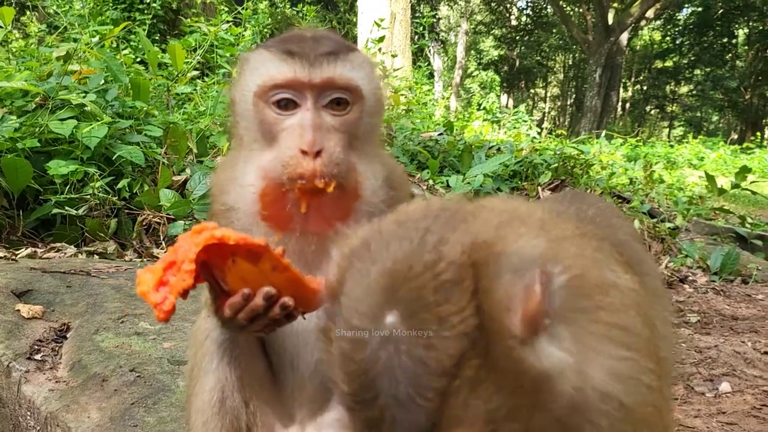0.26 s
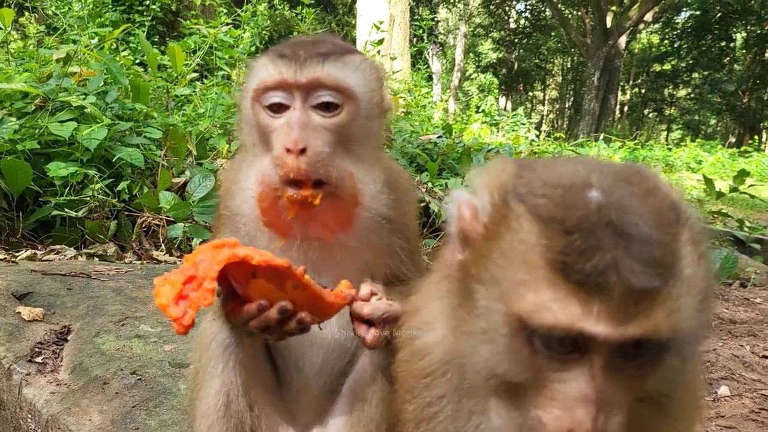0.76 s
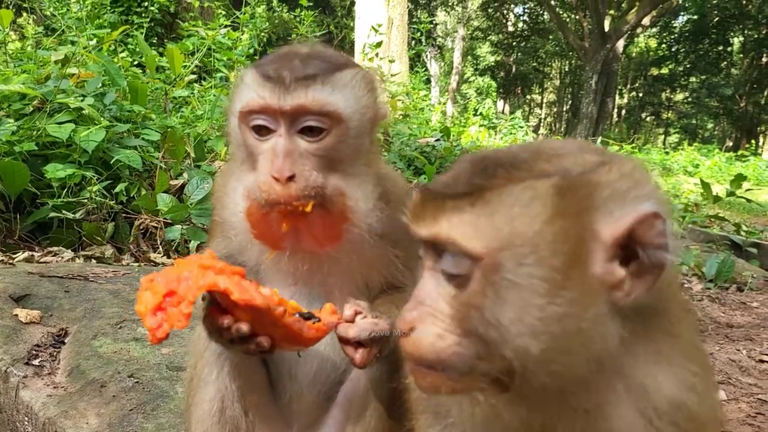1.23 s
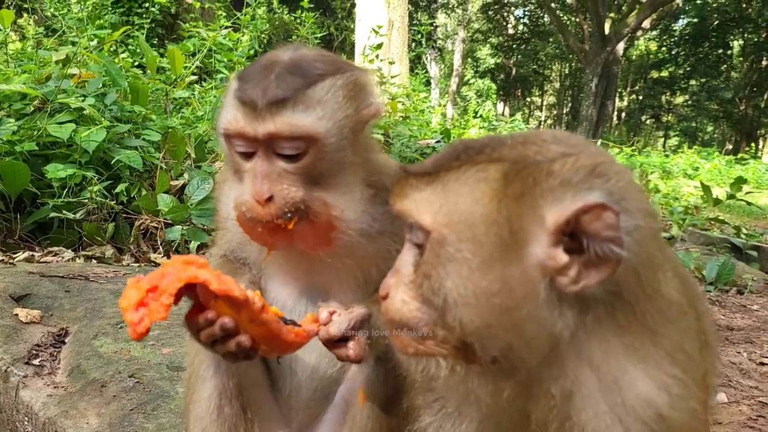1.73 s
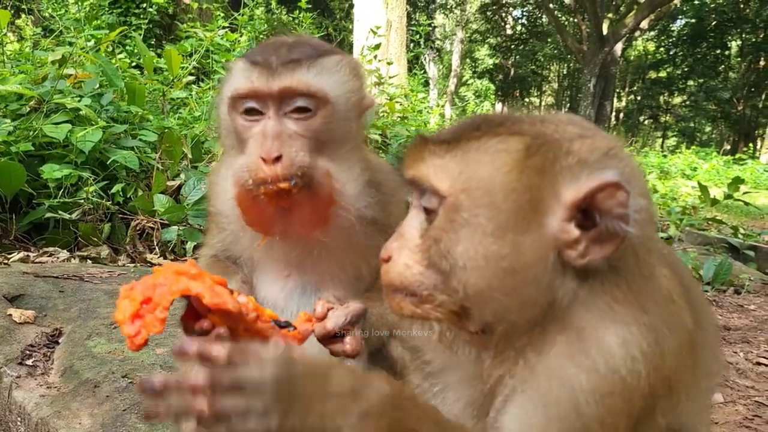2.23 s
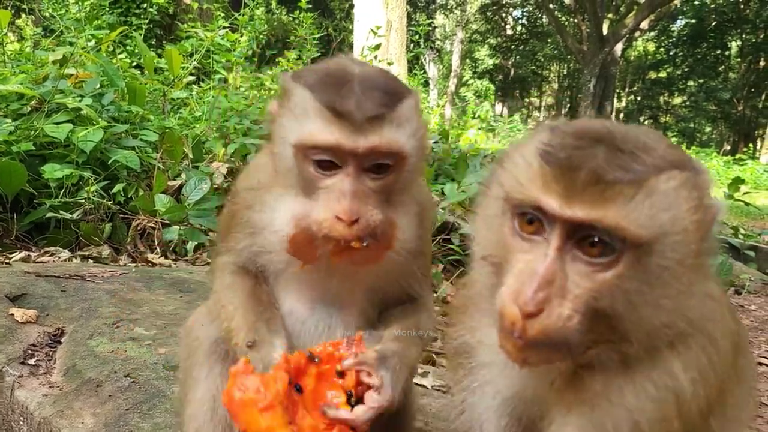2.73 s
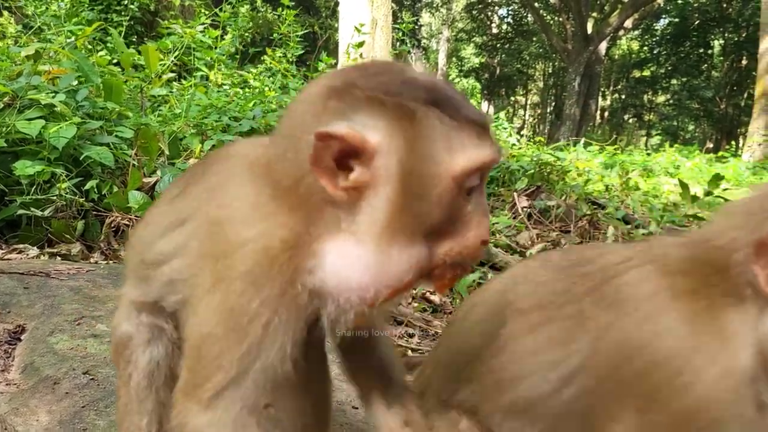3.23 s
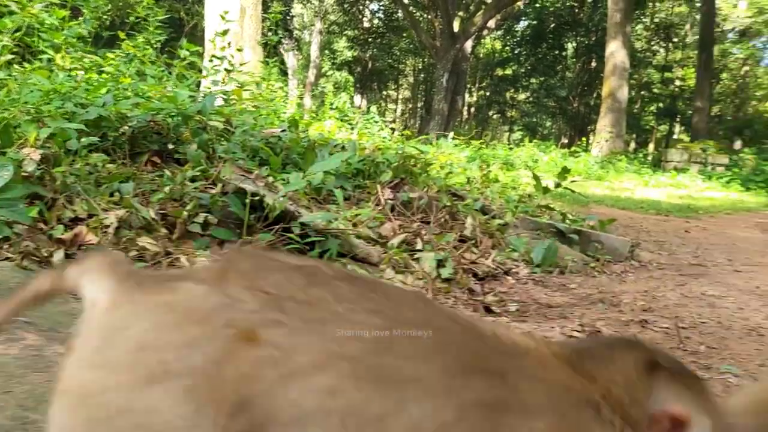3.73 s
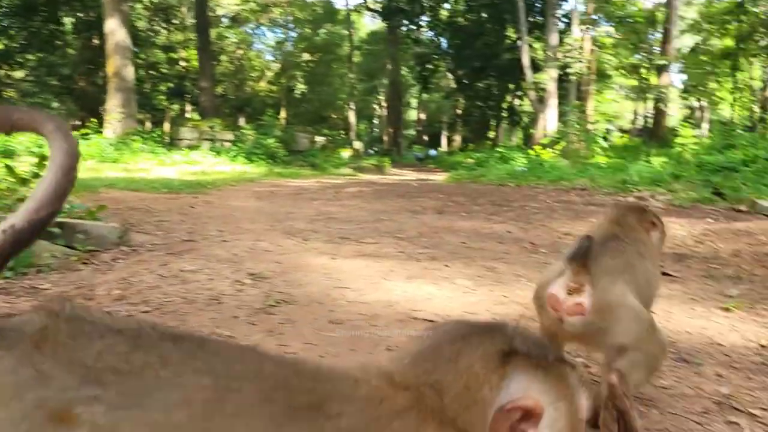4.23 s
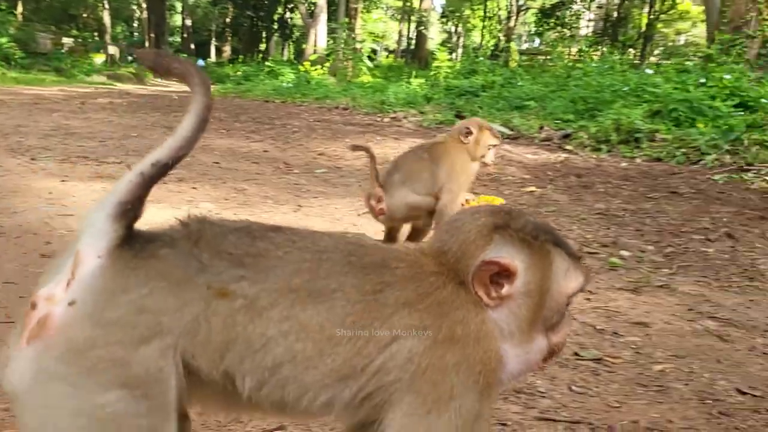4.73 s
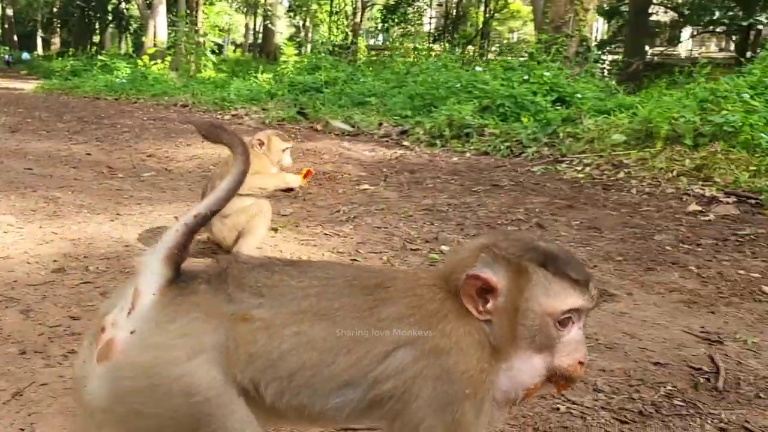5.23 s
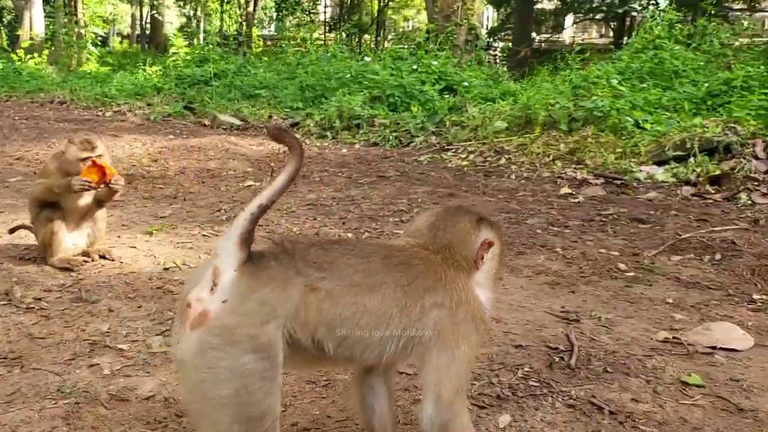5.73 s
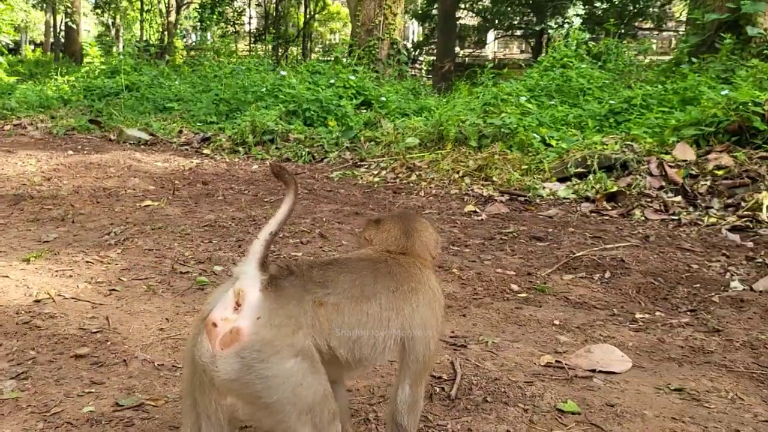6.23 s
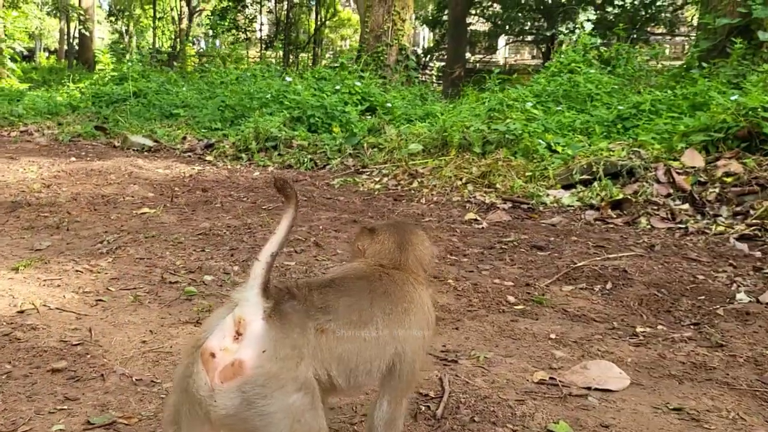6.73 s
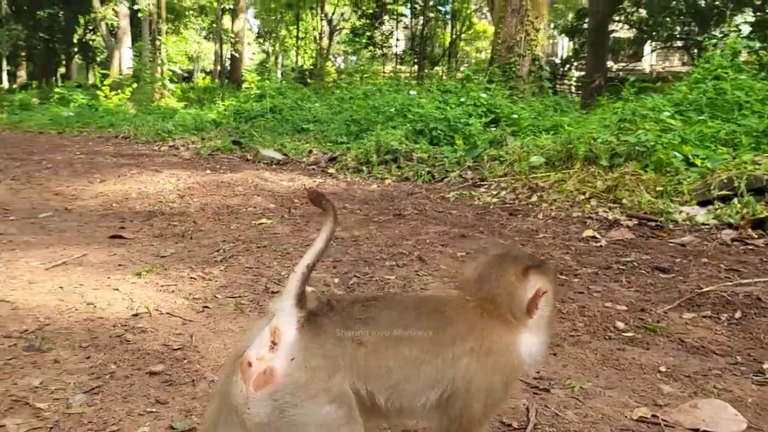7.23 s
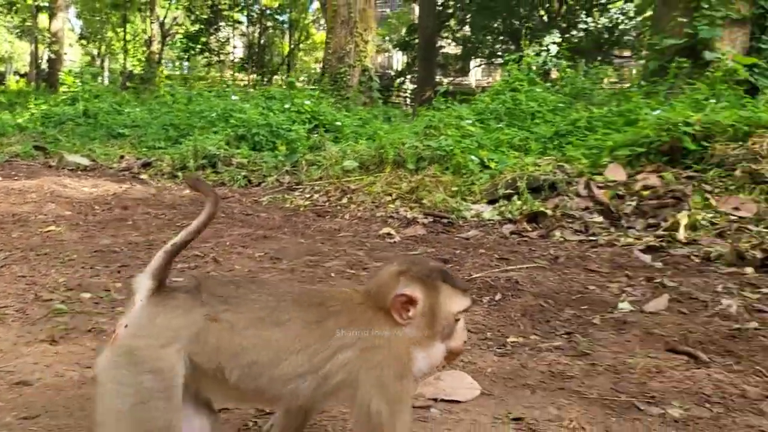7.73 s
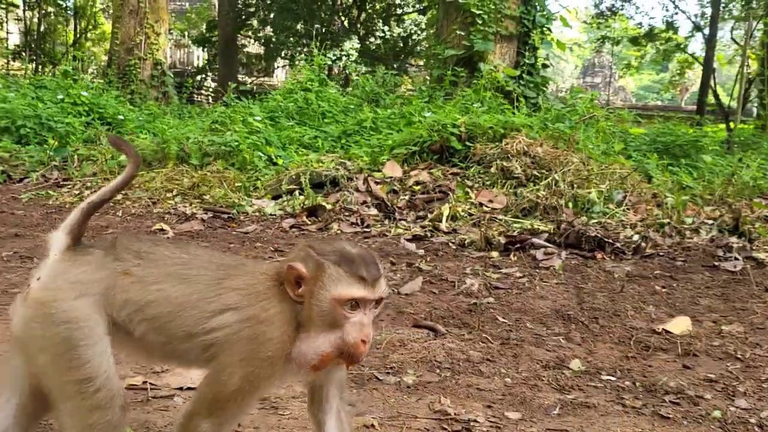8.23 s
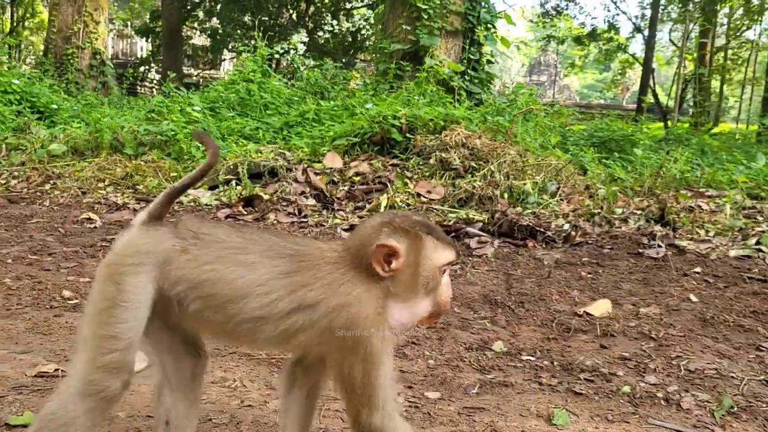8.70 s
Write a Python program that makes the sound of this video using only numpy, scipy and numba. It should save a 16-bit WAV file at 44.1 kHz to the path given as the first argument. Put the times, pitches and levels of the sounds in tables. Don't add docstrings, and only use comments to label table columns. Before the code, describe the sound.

Cicadas whine steadily in a forest clearing over low engine throb, while nearby monkeys snap twigs, squeak sharply once and step on soil.

```python
import sys
import numpy as np
from scipy import signal
from scipy.io import wavfile
from scipy.ndimage import uniform_filter1d
from numba import njit

SR = 44100
rng = np.random.default_rng(int(sys.argv[2]) if len(sys.argv) > 2 else 0)


def unload_audio(sound):
    columns = np.transpose(np.atleast_2d(sound))
    steps = np.round(np.clip(columns, -1, 1) * 32767)
    wavfile.write(sys.argv[1], SR, steps.astype(np.int16))


def gain_from_decibels(decibels):
    exponent = np.asarray(decibels, float) / 20
    return 10 ** exponent


N = 395136
TIME = np.arange(N) / SR


def level(x, db):
    return x * gain_from_decibels(db) / np.sqrt(np.mean(x ** 2))


def curves(table):
    s, *columns = np.transpose(table)
    return [np.interp(TIME, s, c) for c in columns]


def blend(*dbs):
    return 10 * np.log10(sum(gain_from_decibels(2 * db) for db in dbs))


@njit
def svf(x, hz, width):
    y, b, l = np.empty(len(x)), 0., 0.
    for i in range(len(x)):
        g, k = np.tan(np.pi * hz[i] / SR), width / hz[i]
        v = (b + g * (x[i] - l)) / (1 + g * (g + k))
        b, l, y[i] = 2 * v - b, l + 2 * g * v, k * v
    return y


def ring(x, hz, width, order=2):
    lo = np.sqrt(hz ** 2 + width ** 2 / 4) - width / 2
    edges = [lo, min(lo + width, .45 * SR)]
    return signal.sosfilt(signal.butter(order, edges, "band", fs=SR, output="sos"), x)


def walk(rate):
    hold = max(int(SR / 64 / rate), 1)
    held = np.repeat(rng.standard_normal(N // 64 // hold + 2), hold)
    coarse = uniform_filter1d(uniform_filter1d(held, hold), hold)
    return 1.3 * np.interp(np.arange(N) / 64, np.arange(len(coarse)), coarse)


def pair(likeness):
    mid, side = rng.standard_normal((2, N))
    c = np.clip(likeness, -1, 1)
    return np.sqrt(1 + c) * mid + np.sqrt(1 - c) * side * np.array([[1], [-1]])


def clicks(hz, jitter, scatter_db):
    timing, size = rng.standard_normal((int(N * hz / SR), 2)).T
    at = np.cumsum(1 + jitter * timing) * SR / hz
    return np.bincount(np.clip(at, 0, N - 1).astype(int), gain_from_decibels(scatter_db * size), N)


def glide(length, from_hz, to_hz, width):
    n = int(length * SR)
    path = np.linspace(from_hz, to_hz, n + 400)
    tone = svf(rng.standard_normal(n + 400), path, 1. * width)[400:]
    return level(tone, 0) * np.hanning(n) ** 0.37


def sides(pan_db):
    return gain_from_decibels(np.array([[.5], [-.5]]) * pan_db)


def add(out, s, burst, pan_db=0.):
    lag = int(np.clip(pan_db * 3, -18, 18))
    for side, sign in enumerate((1, -1)):
        i = int(s * SR) - sign * lag // 2
        out[side, i:i + len(burst)] += burst * 2 / (1 + gain_from_decibels(-sign * pan_db))


def trees(x, wet_db):
    t60_s = 0.091
    t = TIME[:int(.6 * SR)]
    tail = rng.standard_normal((2, len(t))) * np.exp(-np.log(1000) * t / t60_s) * (t > .01)
    return gain_from_decibels(wet_db) * signal.fftconvolve(x, tail / np.sqrt(np.sum(tail[0] ** 2)), axes=1)[:, :N]


# start_s, level_db
CHORUS = [(0.0, -48.5), (1.27, -50), (2.2, -49.5), (3.0, -50), (3.8, -49), (4.5, -50), (5.5, -49.5),
          (6.2, -48.5), (7.901, -49.5), (8.43, -46.5), (8.96, -48)]
# start_s, left_minus_right_db
CHORUS_PAN = [(0, 3.5), (2.6, 2), (4.2, 5), (4.6, 0), (5.7, -1), (7.8, -1), (8.96, -3.5)]


def cicadas():
    out = np.zeros((2, N))
    upper_db = curves(CHORUS)[0]
    lower_db = blend(-78, curves(HISS)[0] - 9, phrase() - 13)
    for db, lo_hz, hi_hz, count in ((upper_db, 7130, 7510, 6), (lower_db, 6710, 6800, 2)):
        choir = np.zeros((2, N))
        for hz in np.linspace(lo_hz, hi_hz, count):
            taper_db = -5 * ((2 * hz - lo_hz - hi_hz) / (hi_hz - lo_hz) + 0.34) ** 2
            buckles = np.array([clicks(rng.uniform(150, 300), .3, 4.54) for _ in out])
            singing = level(ring(buckles, hz, 109.5, order=3), 0)
            choir = choir + singing * gain_from_decibels(taper_db + 1.9 * walk(9))
        stragglers = ring(pair(0.), (lo_hz + hi_hz) / 2 - 50, 2.2 * (hi_hz - lo_hz), order=3)
        out = out + (level(choir, 1.34) + level(stragglers, -25)) * gain_from_decibels(db)
    flicker_db = 1.57 * np.array([walk(25), walk(25)])
    return out * gain_from_decibels(flicker_db) * sides(curves(CHORUS_PAN)[0])


# start_s, length_s, level_db
PHRASES = [
    (6.45, .95, -61),
    (7.87, .98, -63),
]


def phrase():
    rise_s, fall_s, sag_db = .15, .15, -5
    gain = 1e-4
    for s, length, db in PHRASES:
        edge = np.minimum((TIME - s) / rise_s, (s + length - TIME) / fall_s)
        tired_db = sag_db * np.clip((TIME - s) / length, 0, 1)
        gain = gain + np.clip(edge, 0, 1) ** 2 * gain_from_decibels(db + 80 + tired_db)
    return 20 * np.log10(gain) - 80


def singer():
    buckles = np.array([clicks(400, .3, 3.7) for _ in range(2)])
    low = level(ring(buckles, 4560, 160), -1.8) * gain_from_decibels(2.2 * walk(18))
    high = level(ring(buckles, 6100, 300), -11)
    overtone = level(ring(buckles + .3 * pair(0.), 9120, 1540, order=5), -9.0)
    return (low + high + overtone) * gain_from_decibels(phrase() + 1.2 * walk(12))


# start_s, length_s, level_db, first_pitch_hz, breath_db
SLURS = [
    (0.335, 0.086, -79, 4250, 9.5),
    (1.068, 0.07, -78, 4400, 7),
    (1.85, 0.13, -67, 4400, 2),
    (2.74, 0.092, -72, 4400, 6),
    (4.215, 0.15, -74, 3810, 4),
    (4.955, 0.125, -75, 4200, 1),
    (6.19, 0.1, -79, 4570, -8),
    (7.363, 0.1, -78, 4450, -4),
    (7.887, .07, -79, 4850, -2),
]


def bird():
    rise_hz_per_s, flutter_db, echo_db = 11500, 3, -4
    out = np.zeros((2, N))
    for s, length, db, from_hz, breath_db in SLURS:
        t = TIME[:int(length * SR)]
        whistle = np.sin(2 * np.pi * (from_hz + rise_hz_per_s * t / 2) * t)
        pure = np.sqrt(2) * whistle * np.hanning(len(t)) ** .4
        breath = glide(length, from_hz, from_hz + rise_hz_per_s * length, 380)
        add(out, s, gain_from_decibels(db) * (pure + gain_from_decibels(breath_db) * ring(breath, 4900, 2400)), 3.)
    out = out * gain_from_decibels(flutter_db * walk(45))
    return out + trees(out, echo_db)


# start_s, peak_db, ring_pitch_hz, crackle_db, left_minus_right_db
SNAPS = [(0.7453, -25, 2780, -52, 1), (1.9624, -29, 5040, -32, 4), (2.9937, -32.5, 2450, -7, 1.5),
         (3.057, -29, 2900, -7, 13), (3.068, -39, 2900, 9, -1.5), (3.0752, -29.5, 2820, -1, 13),
         (3.118, -46, 2900, 6, 2), (3.2136, -12, 1455, -2, 31), (4.464, -33, 2860, -44, -14),
         (4.607, -27.5, 2970, -65, 1), (5.2505, -42, 3020, -60.5, 0), (5.2971, -27.5, 3140, -59, 4.5),
         (5.3059, -26, 3060, -60, -1), (6.9147, -26.5, 2560, -60, -1.5)]


def snaps(out):
    t60_s, splinters = 0.004, .2
    width, broad = .2, .2 * .8
    t = TIME[:4000]
    for s, db, hz, crackle_db, pan_db in SNAPS:
        fade = np.minimum(t / 0.00057, 1) * np.exp(-np.log(1000) * t / t60_s)
        noise = rng.standard_normal((2, len(t))) * fade
        snap = (t == 0) + splinters * noise[0]
        wood = ring(snap, hz, hz * width) + broad * ring(snap, 3040, 2400, order=4)
        leaf = ring(noise[1], 7160, 9000, order=3)
        burst = wood / wood.max() + gain_from_decibels(crackle_db) * leaf / leaf.max()
        add(out, s - .0002, gain_from_decibels(db - 6.0) * burst, pan_db)


# start_s, length_s, centre_pitch_hz,
# level_db, left_minus_right_db
RUSTLES = [(0.68, 0.04, 2400, -63, 4), (2.276, 0.04, 8400, -63, -0.5), (2.987, 0.017, 12400, -56, 13),
           (3.041, 0.088, 12000, -58, -3), (3.04, .07, 13000, -54, 0), (3.2136, 0.0021, 5600, -25.5, 29.5),
           (3.2134, 0.0026, 3130, -31, 27), (3.14, 0.077, 11500, -66, 8), (3.42, .2, 11300, -81, 3.5),
           (.75, .05, 4500, -61, 4), (.745, 0.053, 2280, -60, 2), (3.753, 0.045, 1400, -42.5, 2.5),
           (6.72, 0.1, 11000, -76, 0.5), (3.758, 0.11, 14200, -50.5, -1.5), (3.764, 0.097, 9300, -57.5, 6),
           (5.63, 0.014, 1370, -56, -7), (5.238, 0.095, 2740, -59, 1.5), (5.259, 0.07, 3570, -50.5, -2),
           (4.605, 0.0095, 1340, -58, -16), (6.721, .17, 2540, -54.5, 17), (0.759, 0.014, 11500, -65, 20),
           (3.2125, 0.006, 11050, -40, 20), (3.736, 0.011, 14000, -39.5, -3.5), (7.43, 0.21, 233, -62.5, 9)]


def rustles(out):
    for s, length, hz, db, pan_db in RUSTLES:
        n = int(length * SR)
        grains = rng.standard_normal(n) * gain_from_decibels(2.6 * rng.exponential(size=n))
        add(out, s, level(ring(grains, hz, 0.37 * hz, order=4), db) * np.hanning(n) ** .5, pan_db)


# start_s, peak_db, thud_pitch_hz, scuff_db, left_minus_right_db
STEPS = [
    (3.21, -35, 542, -20, 25),
    (3.962, -46, 154, -3.5, -2.5),
    (4.141, -50, 172, -26.5, 2),
    (5.389, -39.5, 151.3, -30.5, 2.5),
    (5.621, -25, 194, -5.5, -4),
    (5.63, -30.5, 178, -12.5, -2),
    (6.913, -47.5, 205, 8.5, -3),
]


def steps(out):
    t = TIME[:4000]
    for s, db, hz, scuff_db, pan_db in STEPS:
        thud = -np.cos(2 * np.pi * hz * t) * (t / 0.0014) ** 2 * np.exp(-t / 0.0014)
        scuff = ring(rng.standard_normal(len(t)) * t * np.exp(-t / 0.001), 1330, 295, order=4)
        add(out, s + 0.0014, gain_from_decibels(db) * (2.3 * thud + gain_from_decibels(scuff_db) * scuff / scuff.max()), pan_db)


# start_s, length_s, throat_pitch_hz, width_hz, level_db
SQUEAK = [
    (3.7375, 0.0125, 3900, 260, -22),
    (3.737, 0.011, 6040, 400, -19),
    (3.763, .024, 7270, 497, -26),
    (3.761, 0.022, 5500, 3040, -35.5),
    (3.77, 0.016, 6450, 300, -25.5),
    (3.782, 0.019, 5030, 40, -22.5),
    (3.793, 0.047, 2860, 943, -45.5),
]


def squeak(out):
    for s, length, hz, width, db in SQUEAK:
        sag = 250 * np.exp(-width / 300)
        add(out, s, gain_from_decibels(db) * ring(glide(length, hz + sag, hz - sag, width), 4760, 7100), -4.)


def monkeys():
    out = np.zeros((2, N))
    snaps(out)
    rustles(out)
    steps(out)
    squeak(out)
    return out + trees(out, -19.0)


# start_s, length_s, centre_pitch_hz, level_db, left_minus_right_db
CHIRPS = [(.36, .16, 4840, -63, 11), (1.935, .055, 5600, -60, 6), (1.945, .04, 5100, -62, 6),
          (2.14, .04, 3300, -57, 6), (3.34, .12, 12500, -72, 2), (3.36, .05, 11450, -72, 2),
          (3.47, .16, 11500, -74, 3), (3.98, .05, 14350, -76, 5), (3.36, .06, 14400, -76, 6),
          (3.36, .06, 15400, -78, 6), (3.527, .12, 14600, -72, 8), (3.56, .06, 15200, -74, 8),
          (3.53, .05, 13300, -73, 6), (6.773, .07, 3800, -62, 6), (6.92, .035, 3650, -64, 6),
          (7.08, .065, 4330, -60, 3), (7.615, .035, 4350, -72, 1), (5.288, .025, 4060, -56, -0.5),
          (5.291, .025, 2240, -59, 1)]


def chirps():
    out = np.zeros((2, N))
    for s, length, hz, db, pan_db in CHIRPS:
        n = int(length * SR)
        burst = ring(rng.standard_normal(8000), hz, 350, order=3)[-n:]
        add(out, s, level(burst, db) * np.hanning(n) ** .5, pan_db)
    return out


# start_s, shaft_pitch_hz, level_db
REVS = [(0.0, 74.5, -64.5), (1.07, 75.3, -47), (1.62, 73, -76), (1.85, 70.5, -40), (2.27, 94.0, -52),
        (3.57, 96.0, -65), (4.02, 76.5, -59), (4.59, 73, -72), (4.69, 68.0, -61.5), (5.49, 61.78, -55.5),
        (5.89, 84.7, -48), (6.81, 93.5, -53.5), (7.31, 88.4, -50), (8.11, 96.6, -59.5),
        (8.36, 87.96, -46.5), (8.73, 94.8, -60), (8.96, 82.7, -56.5)]
# start_s, level_db
LOAD = [(0.0, -81), (0.67, -85.5), (1.57, -70.5), (2.0, -68), (2.22, -57.5), (2.54, -54), (3.04, -51.5),
        (3.42, -57.5), (3.72, -53.5), (4.12, -66.5), (4.72, -91.5), (5.66, -79.5), (6.26, -64),
        (6.74, -56.5), (7.4, -60), (7.65, -65), (7.95, -59), (8.17, -57.5), (8.24, -65), (8.96, -64)]
# start_s, level_db
HISS = [(0, -69), (.67, -67), (1.57, -66.5), (2.0, -64.5), (2.54, -67), (3.04, -59), (3.42, -62),
        (3.8, -56), (4.12, -67), (4.72, -84.5), (5.16, -76), (5.4, -90), (6.26, -99), (6.74, -63.5),
        (6.95, -61), (7.15, -66), (7.3, -73), (7.5, -86.5), (8.3, -70), (8.96, -75.5)]
# start_s, left_minus_right_db
HISS_PAN = [(0, 12.5), (2.6, 8), (4.1, 7.5), (4.5, 4), (5.7, 6.5), (7.6, 6.5), (8.1, 0), (8.96, 0)]
# pitch_hz, width_hz, level_db
WORK_BANDS = [
    [(1281, 262, 3), (609, 120, -14), (840, 590, -8.5), (338, 110, -25)],
    [(2030, 550, -1), (2880, 650, 1.5)],
    [(3475, 370, -2), (3846, 406, 3.5), (4330, 590, 2), (4714, 290, 1.5), (5500, 680, -9),
     (6330, 430, -5.5)],
    [(8970, 550, 2), (9920, 3100, -6), (10600, 1100, -8)],
]


def working():
    hz, db = curves(REVS)
    shaft = np.sin(2 * np.pi * np.cumsum(hz * (1 + .01 * walk(10))) / SR)
    out = gain_from_decibels(db + 2 + 1.5 * walk(8)) * shaft
    gust = walk(3.766)
    load, hiss, turn = curves(LOAD)[0], curves(HISS)[0], curves(HISS_PAN)[0]
    levels = load, blend(load - 12, hiss - 4), hiss, hiss - 14.5
    pans = -5, .4 * turn, turn, .3 * turn
    for db, band, pan_db, patchy_db in zip(levels, WORK_BANDS, pans, (1.8, 1.3, 1.8, 1.3)):
        noise, air = pair(.5), 0
        for f, width, part_db in band:
            air = air + level(ring(noise, f, width, order=3), 0) * gain_from_decibels(part_db + patchy_db * walk(12))
        out = out + level(air, 3.6) * gain_from_decibels(db + 0.5 * gust + 1.25 * walk(30)) * sides(pan_db)
    return out


# start_s (middle), thud_db, half_length_s, drone_minus_thud_db
GUSTS = [(0.273, -42.5, 0.045, -17), (0.719, -43.5, 0.026, -1.5), (0.94, -40, 0.17, -5),
         (1.336, -35.5, .06, -2.5), (1.501, -40, 0.035, -8), (1.801, -45, 0.065, -3),
         (2.006, -39.5, 0.1, -0.5), (2.367, -39.5, 0.12, -0.5), (2.606, -34.5, 0.075, -4),
         (2.914, -40.5, 0.13, 3), (3.116, -44, 0.054, 6.5), (3.346, -41.5, 0.019, -2),
         (3.483, -51.5, 0.036, 3), (3.585, -41.5, 0.076, 0), (3.771, -37, 0.039, 0),
         (3.937, -44.5, 0.045, -2), (4.2, -55, 0.25, -7), (4.76, -47, 0.2, -0.5), (4.932, -39, 0.084, -8),
         (5.403, -51, .05, 5), (5.612, -48, 0.036, 6), (5.837, -48.5, 0.076, 2.5),
         (5.998, -44.5, 0.14, -2.5), (6.575, -44.5, 0.18, -0.5), (7.1, -48, 0.14, -3),
         (7.292, -55.5, 0.039, 9), (7.692, -44.5, .14, 0.5), (7.848, -50.5, 0.019, 12.5),
         (8.1, -45, 0.22, -2), (8.596, -39, 0.095, -3)]


def gusts():
    s, db, half, tilt_db = np.transpose(GUSTS)[:, :, None]
    t = TIME[::64]
    bell = np.exp(-((t - s) / half) ** 2)

    def lift(peak_db, lull_db):
        power = gain_from_decibels(2 * lull_db) + np.sum(bell * gain_from_decibels(2 * peak_db), axis=0)
        return np.interp(TIME, t, 10 * np.log10(power))

    thud, drone = lift(db, -58.5), lift(db + tilt_db, -57.5)
    growl = -59 + 0.63 * (drone - drone.mean())
    return thud, drone, growl


def idling():
    firings = clicks(25.1, 0.019, 2.3)
    out = level(ring(pair(0.92), 30, 30), -64.5) * gain_from_decibels(3.0 * walk(7.3))
    lumps = walk(13)
    for db, hz, width, noise_db in zip(gusts(), (51, 86, 145), (14, 45, 85), (-8, 1.5, 3)):
        beats = level(ring(firings, hz, width, order=3), 0)
        smear = level(ring(pair(1.0), hz, width, order=3), noise_db)
        out = out + level(beats + smear, -2.8) * gain_from_decibels(db + 0.87 * lumps)
    return out


# start_s, pitch_hz, level_db
WHINES = [
    [(0, 3095, -64), (.7, 3066, -65), (.9, 3047, -62.5), (1.3, 3020, -69), (1.6, 2970, -66),
     (2.0, 2977, -68), (2.4, 2960, -72), (2.7, 2980, -76)],
    [(2.4, 2960, -72), (2.9, 2970, -60.5), (3.25, 2996, -56.5), (3.6, 3024, -62), (3.95, 3100, -61),
     (4.2, 3200, -70)],
    [(4.1, 3570, -102), (4.4, 3740, -66), (5, 3560, -75), (5.3, 3250, -77), (5.9, 2980, -80),
     (6.2, 2760, -67.5), (6.5, 2640, -65.5), (7.2, 2650, -64), (7.5, 2250, -87), (7.8, 2030, -72),
     (8.1, 2180, -71.5), (8.96, 2182, -74.5)],
    [(4.5, 148.5, -75), (4.9, 153.7, -63), (8.96, 152.1, -67)],
    [(0, 2700, -60), (.3, 2750, -72), (1, 2620, -78)],
]


def whines():
    out = np.zeros((2, N))
    for table, width in zip(WHINES, (95.0, 300.0, 220.0, 1.6, 330.0)):
        span = slice(int(table[0][0] * SR), int(table[-1][0] * SR))
        hz, db = (c[span] for c in curves(table))
        db = db + 1.9 * walk(14)[span]
        noise = pair(np.exp(-hz[0] / 800))
        tone = [svf(svf(n[span], hz, width), hz, width) for n in noise]
        out[:, span] += level(np.array(tone), 0) * gain_from_decibels(db)
    return out


# pitch_hz, level_db (per Hz)
FOREST = [(140, -31), (230, -24.5), (272, -6), (584, -2), (644, -3.5), (1550, -11), (3280, -14), (3620, -9),
          (3930, -23.5), (5050, -22), (6400, -16), (8320, -52), (14100, -120)]


def forest():
    out, swell = 0, walk(0.53)
    hz_table, db_table = np.transpose(FOREST)
    follow_db = 0.14 * (curves(LOAD)[0] + 68)
    for hz in 260 * 2 ** np.arange(0, 4.1, .5):
        db = np.interp(np.log(hz), np.log(hz_table), db_table) + 10 * np.log10(hz)
        db = db + 1.0 * swell + follow_db + 3.0 * walk(24)
        noise = pair(0.13 + 1.1 * np.exp(-(hz / 600) ** 2))
        out = out + level(ring(noise, hz, hz * 0.35, order=3), 0) * gain_from_decibels(db)
    insects = level(ring(pair(0.), 5970, 1050, order=3), -84.5) * gain_from_decibels(1.0 * walk(5.03))
    shelf = level(ring(pair(0.), 8670, 680, order=4), -85.0) * gain_from_decibels(2.0 * walk(20))
    return level(out, -69 + 3.5) + insects + shelf


def scene():
    left, right = working() + idling() + forest()
    early = 18
    left = np.pad(left, (0, early), "edge")[-N:]
    far = np.array([left, right]) * sides(-1)
    return cicadas() + singer() + bird() + monkeys() + chirps() + far + whines()


def top_cut(x):
    return signal.sosfilt(signal.butter(12, 15650, fs=SR, output="sos"), x)


def record(dry):
    heard = signal.sosfilt(signal.butter(2, 21, "high", fs=SR, output="sos"), dry)
    return top_cut(heard)


dry = scene()
out = record(dry)
unload_audio(out)
```